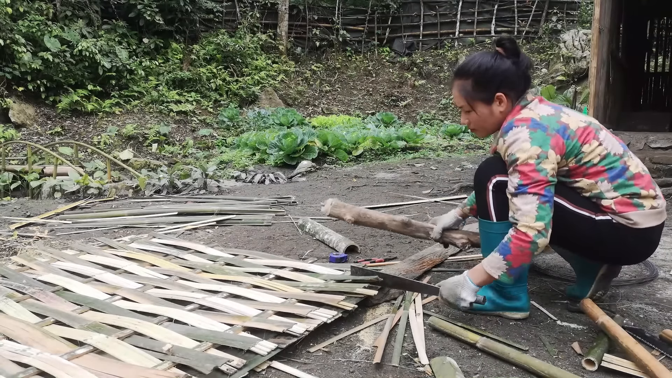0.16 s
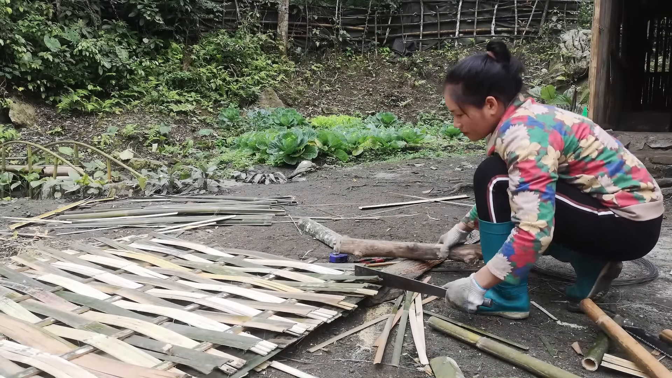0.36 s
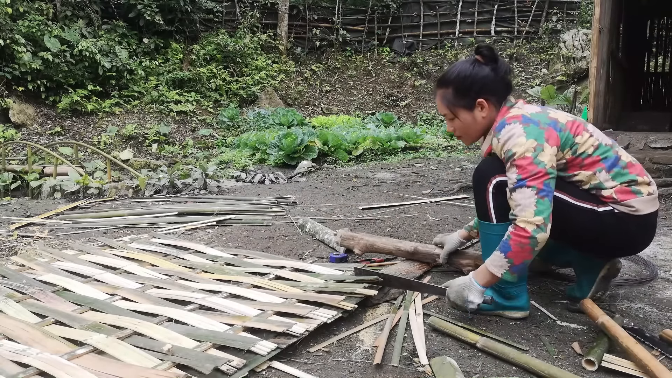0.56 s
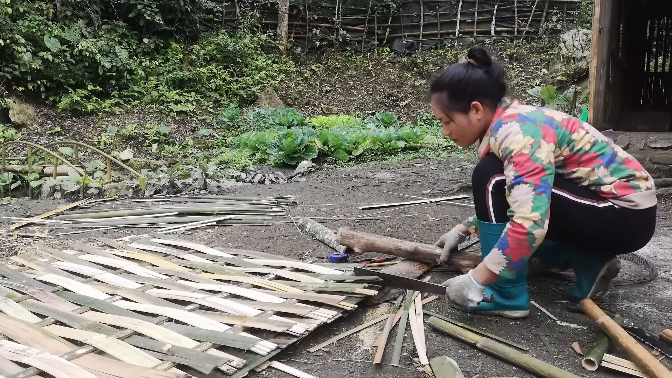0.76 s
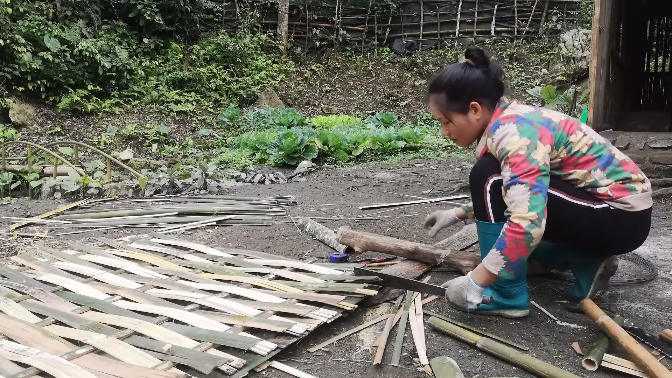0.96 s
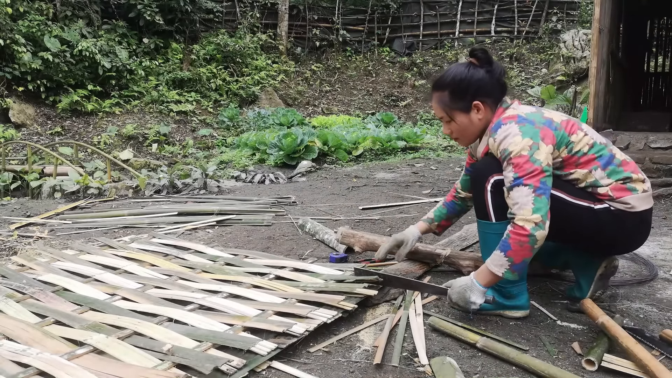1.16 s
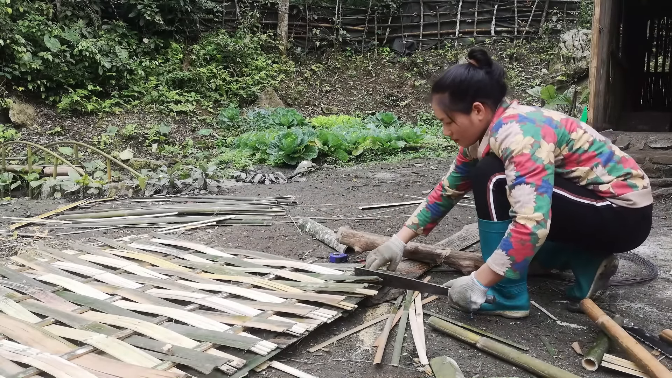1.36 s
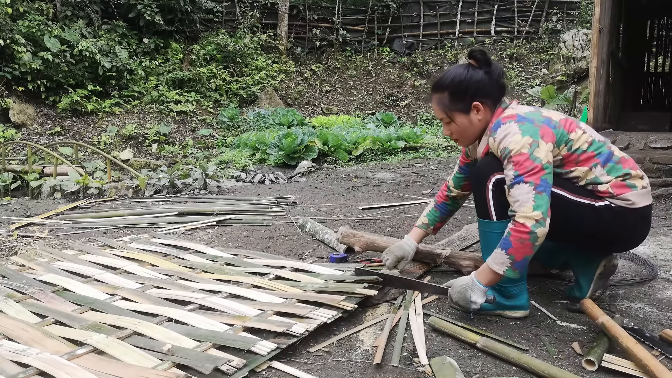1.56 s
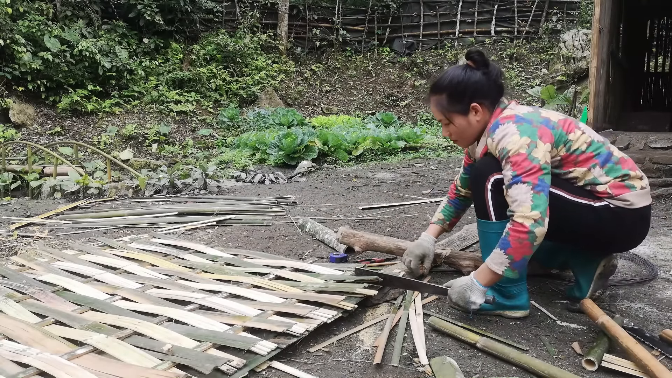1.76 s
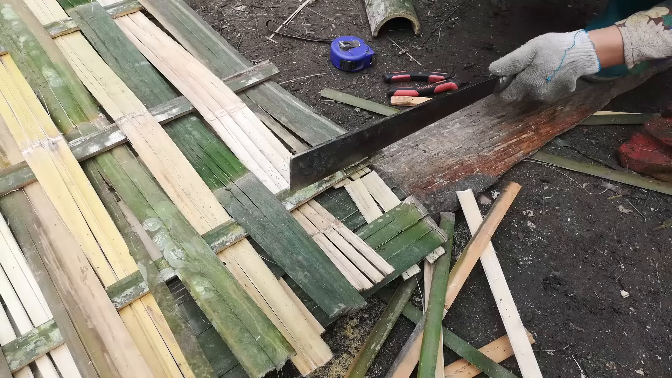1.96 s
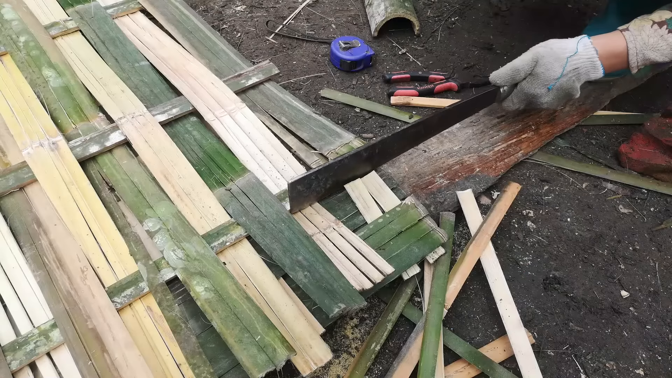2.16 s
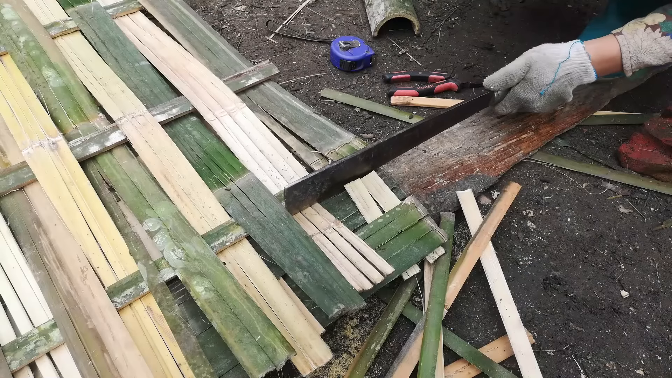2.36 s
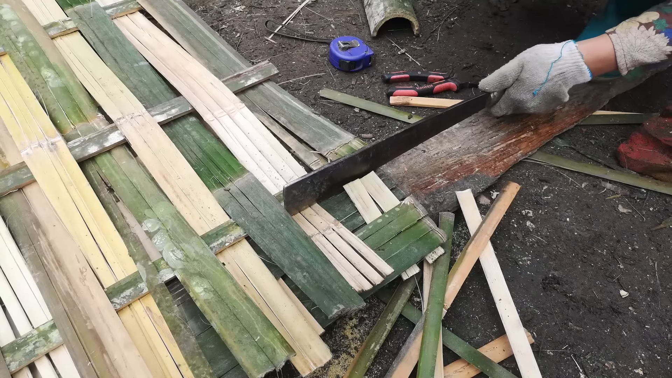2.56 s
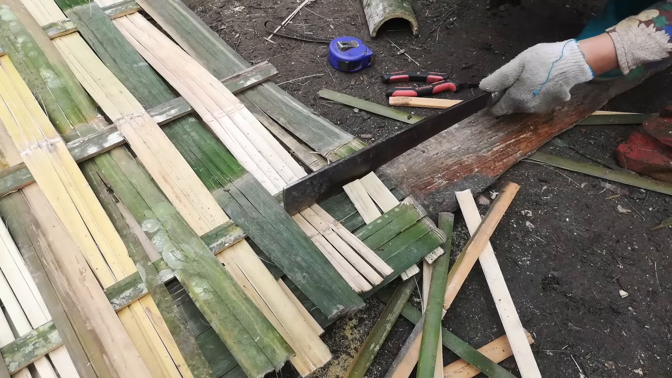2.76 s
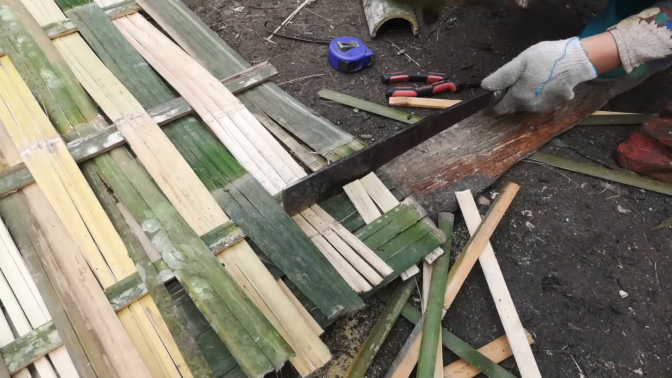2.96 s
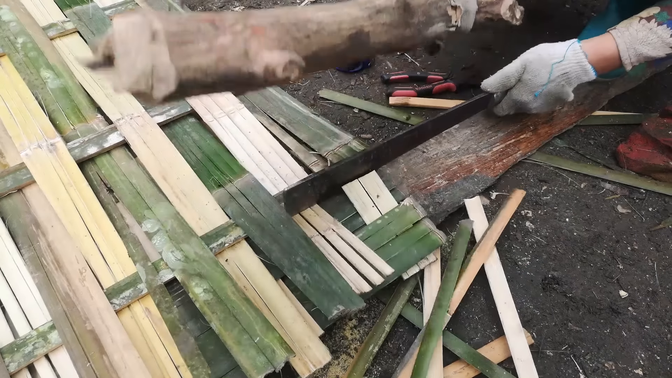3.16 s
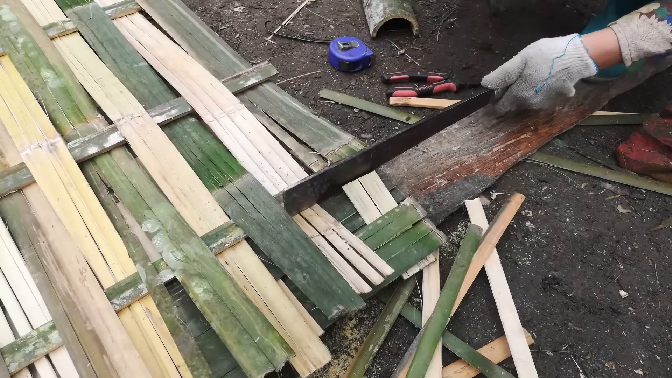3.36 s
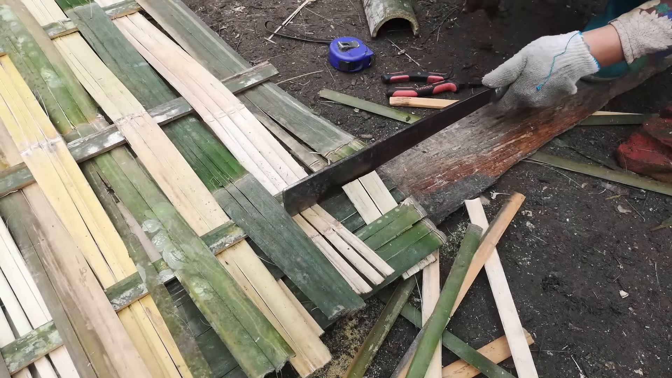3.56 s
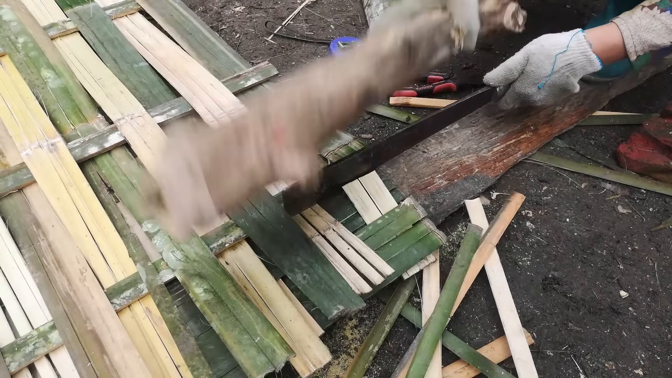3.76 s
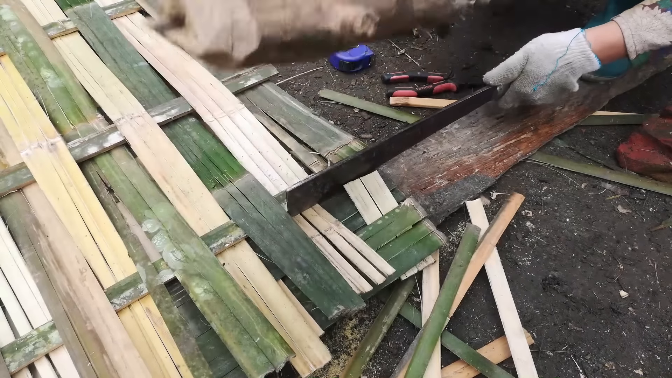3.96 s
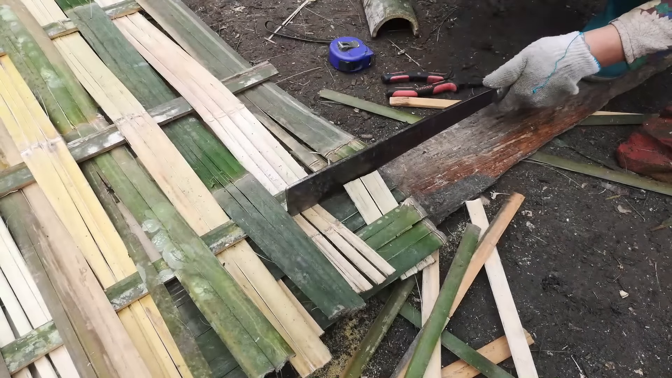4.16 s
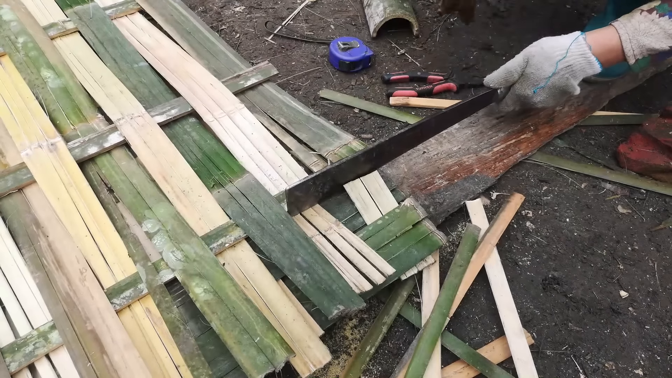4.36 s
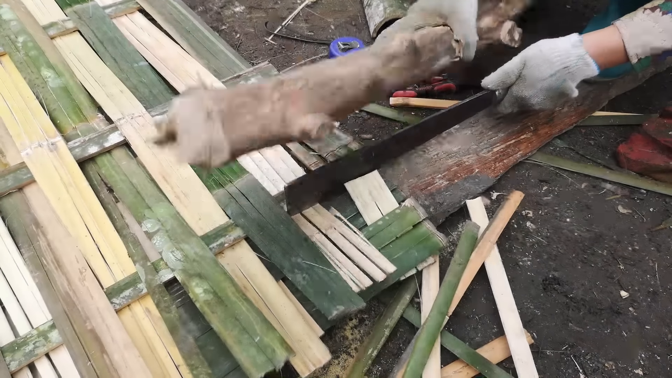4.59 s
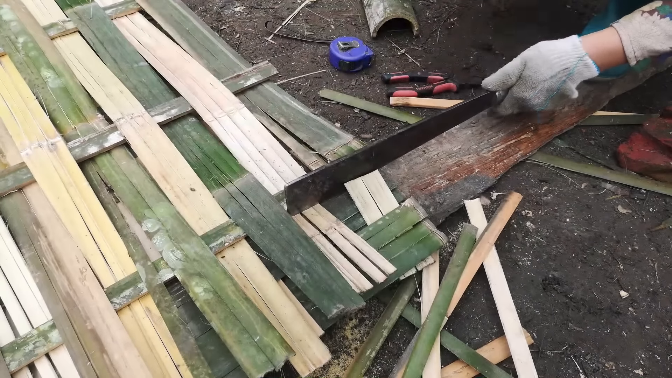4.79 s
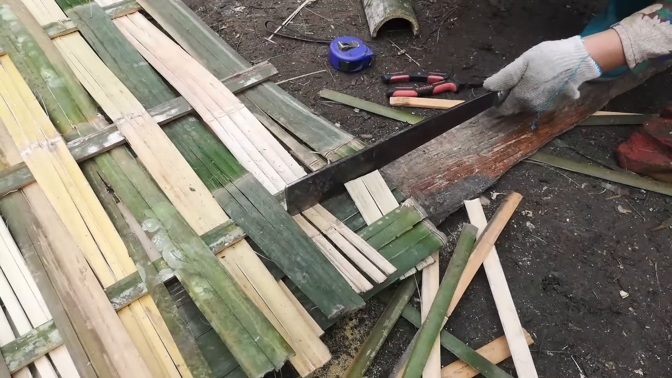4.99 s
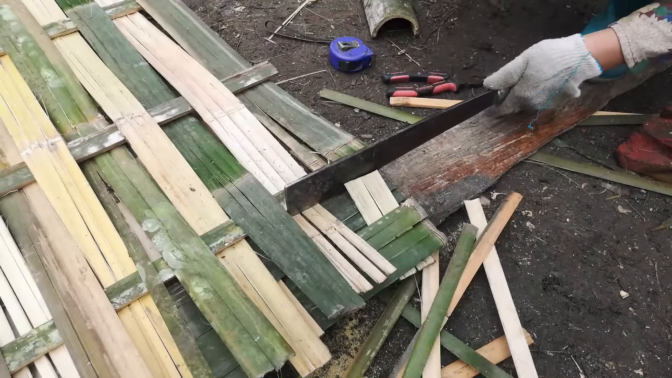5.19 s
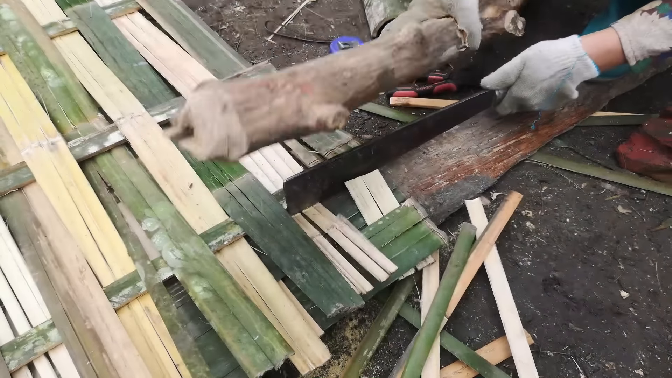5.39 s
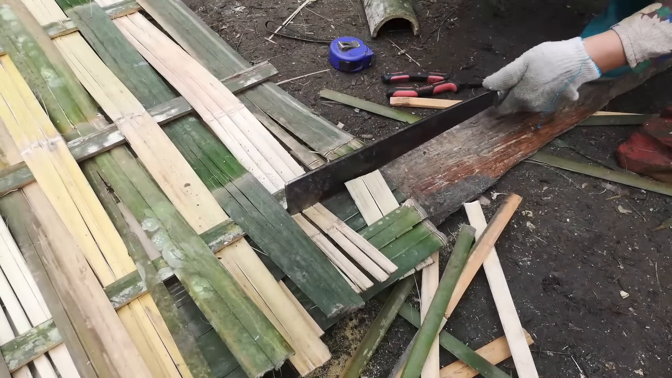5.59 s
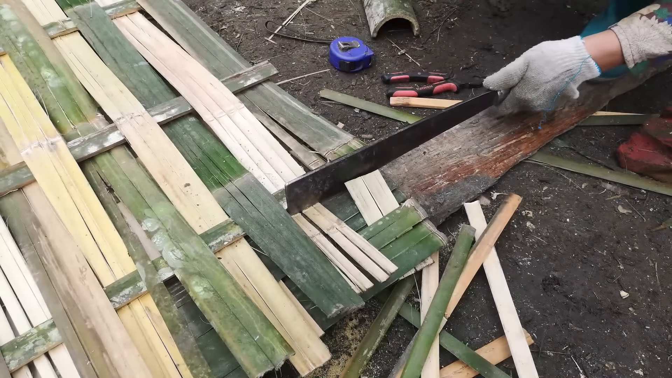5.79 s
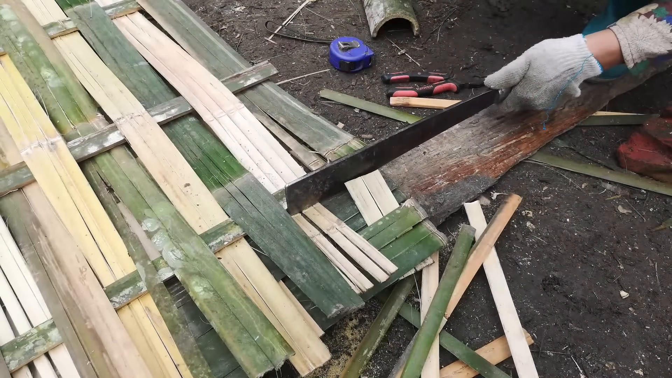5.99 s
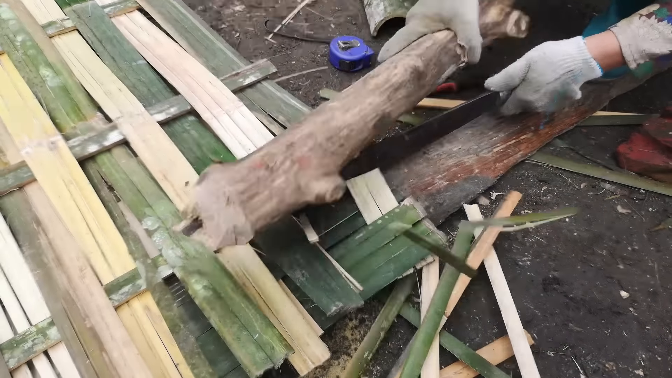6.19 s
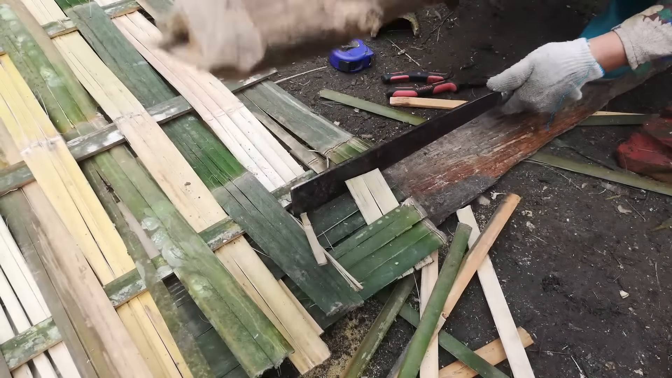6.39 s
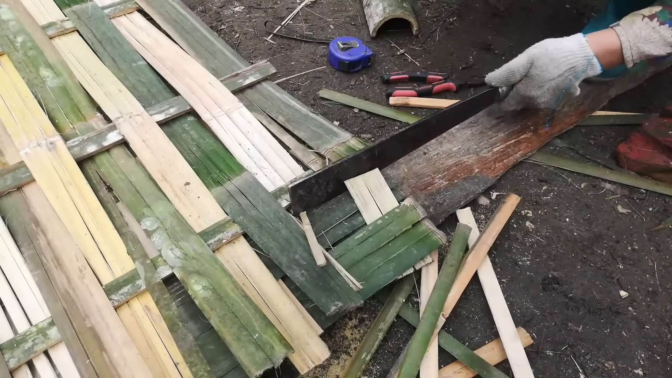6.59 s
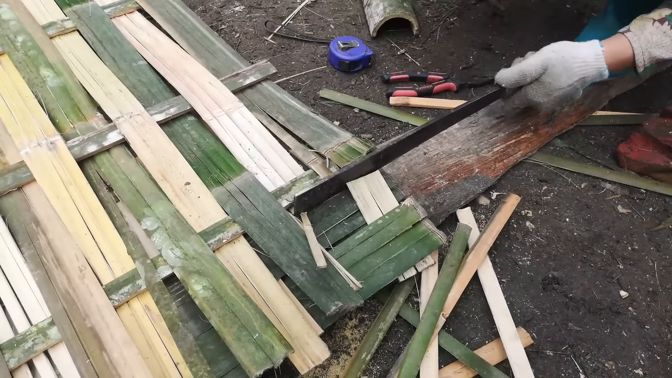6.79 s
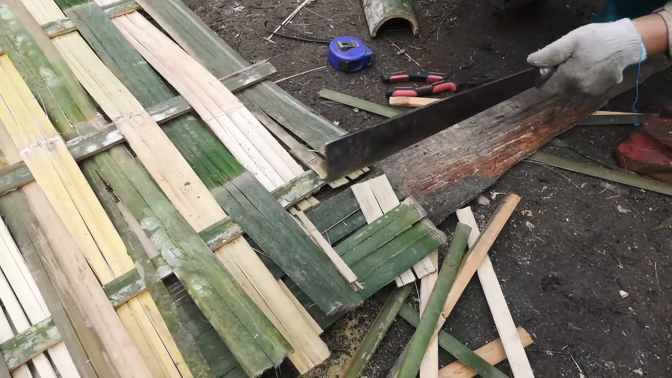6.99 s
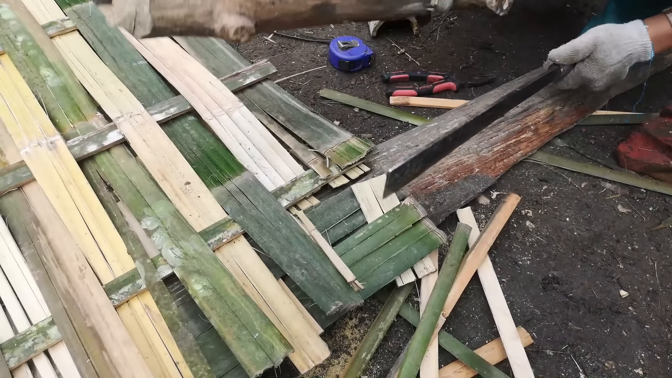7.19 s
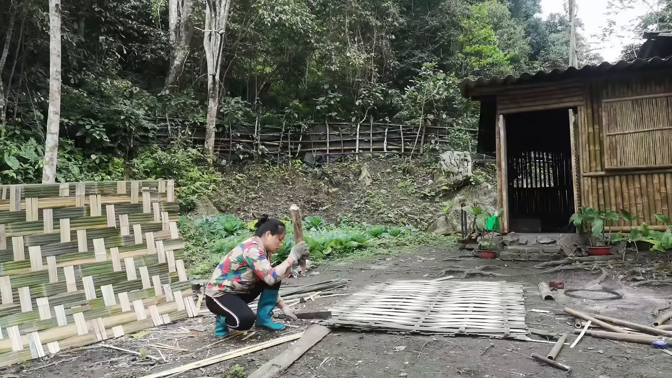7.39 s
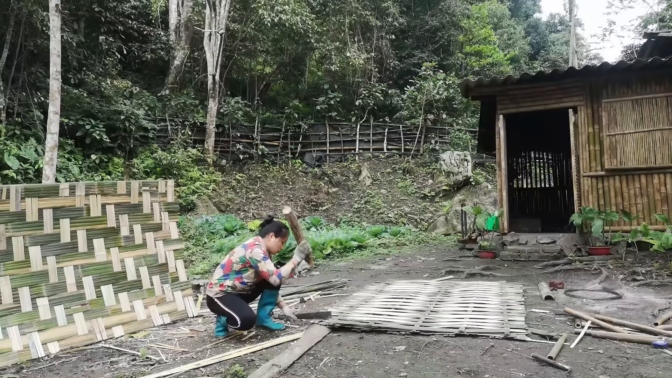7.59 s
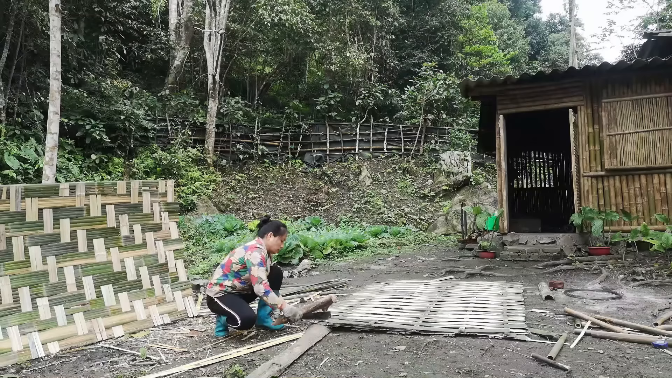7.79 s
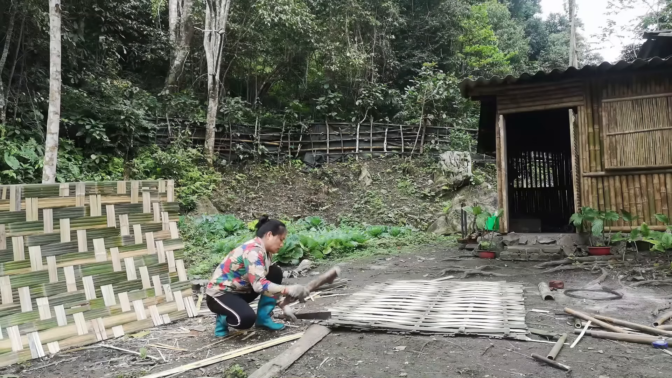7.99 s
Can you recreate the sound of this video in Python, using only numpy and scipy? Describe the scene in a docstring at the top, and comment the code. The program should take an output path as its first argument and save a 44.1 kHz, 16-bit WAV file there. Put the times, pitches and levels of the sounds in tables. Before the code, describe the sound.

A club is dropped on earth, then hammers a blade through bamboo slats in sharp spaced cracks, over leaf hiss, bird whistles and insects.

```python
"""Six hard cracks of a club driving a machete through the edge of a woven bamboo mat, in a yard by a forest.
Leaf hiss, insects, birds and wind lie behind; knocks, rubs and a dropped club precede the blows.
Noise bursts excite decaying modes of wood, steel and earth; an offcut bounces and the blade squeaks out.
Coloured noise makes the forest, the wind and the yard's diffuse echo; gliding sines make the whistles.
A limiter ducks each blow and lets the echo of the yard swell back."""
import sys
import numpy as np
from scipy import signal
from scipy.fft import rfft, irfft, next_fast_len
from scipy.io import wavfile
from scipy.ndimage import uniform_filter1d

SR = 44100
rng = np.random.default_rng(int(sys.argv[2]) if len(sys.argv) > 2 else 0)


def unload_wav(signal):
    """Save mono or channel-first audio to the path in sys.argv[1] as 16-bit WAV at rate SR, clipped to [-1, 1]."""
    wavfile.write(
        sys.argv[1],
        SR,
        np.round(np.clip(np.atleast_2d(signal).T, -1, 1) * 32767).astype(np.int16),
    )


N = 355005
TIME = np.arange(N) / SR
AGE = TIME[:SR // 2]  # time since a contact [s]

# club blows on the blade: (time [s], force [dB], splitting time scale [s], woody bass [dB], and then, relative
# to the body: fibre snaps [dB], blade ring [dB, before the body is levelled], mat rattle [dB], ground boom [dB])
BLOWS = [(3.1402, 16.5, 0.0046, -2, -14, -16, -37.5, -33),
         (3.8974, 17.5, .0042, 0, -14.5, 0.5, -33.5, -35.5),
         (4.6526, 20.5, .0038, -1, -12, 0.5, -29.5, -32.5), (5.4325, 17.5, .004, -1, -14, 2, -31.5, -34),
         (6.275, 26.5, .0036, 1, -14.5, 4, -33.5, -36), (7.8831, 12.5, .0028, 6.5, -7, -3.5, -23, -21.5)]
# club and slats ringing together: (frequency [Hz], t60 [s], level [dB])
CHOP_MODES = [(224, 0.034, -14.5), (515.6, .015, -8.5), (971, 0.015, 0), (1127, 0.014, -4),
              (1367, 0.018, -3.5), (2112, 0.019, -3.5), (2715, 0.013, -1), (3650, 0.0082, -2.5),
              (4890, 0.0072, -12), (5850, 0.0076, -11.5), (6800, 0.024, -14.5), (7730, 0.019, -3)]
# clattering slats: (frequency [Hz], level [dB])
SLATS = [(100, -5.5), (400, -7), (800, -3), (1600, 3), (2400, 1), (3800, -6.5), (6000, 0), (8000, 3),
         (10500, -16.5), (16000, -26)]
# packed earth under an impact: (frequency [Hz], t60 [s], level [dB])
EARTH_MODES = [(81.6, 0.073, -10.5), (176, 0.037, -1), (253.5, 0.081, -7), (387, 0.019, -0.5),
               (455, 0.013, -7)]


def undb(db):
    """Turn decibels into an amplitude gain."""
    return 10 ** (np.asarray(db) / 20)


def unit(x):
    """Scale a sound to an RMS of 1."""
    return x / np.sqrt(np.mean(x ** 2))


def colour(x, points):
    """Causal minimum-phase filter with a (frequency [Hz], level [dB]) response."""
    size = 2 * next_fast_len(x.shape[-1])
    hz, db = np.transpose(points)
    freq = np.maximum(np.fft.rfftfreq(size, 1 / SR), 1)
    response_db = np.interp(np.log(freq), np.log(hz), db)
    cepstrum = irfft(np.log(undb(response_db)))
    # folding the cepstrum onto positive time makes the filter causal
    fold = np.r_[1, np.full(size // 2 - 1, 2), 1, np.zeros(size // 2 - 1)]
    response = np.exp(rfft(cepstrum * fold))
    return irfft(rfft(x, size) * response)[..., :x.shape[-1]]


def whiten(x):
    """Give a burst equal strength at every pitch."""
    spectrum = rfft(x)
    return irfft(spectrum / (np.abs(spectrum) + 1e-12), x.shape[-1])


def ring(modes, detune=0., spread_db=0.):
    """Decaying modes; detune and spread shift their pitch and balance a little at each contact."""
    hz, t60, db = np.transpose(modes)[:, :, None]
    shift, weight = rng.standard_normal((2, len(modes), 1))
    sign = (-1) ** np.arange(len(modes))[:, None]
    decay = np.exp(-np.log(1000) * AGE / t60)
    waves = np.sin(2 * np.pi * hz * (1 + detune * shift) * AGE) * decay
    return np.sum(sign * undb(db + spread_db * weight) * waves, axis=0)


def through(x, response):
    """Pass a sound through a resonant body by convolution."""
    return signal.fftconvolve(np.atleast_2d(x), np.atleast_2d(response), axes=1)[:, :x.shape[-1]]


def walk(rate):
    """Smooth random drift with an RMS near 1, taking this many new values a second."""
    size = int(SR / rate)
    steps = np.repeat(rng.standard_normal(N // size + 1), size)
    return unit(uniform_filter1d(steps, size))[:N]


def grains(size, spread_db, shared=0.4):
    """Dense noise of uneven strength, like tiny clicks, partly alike on both sides."""
    noise = rng.standard_normal((3, size))
    surge = np.repeat(rng.exponential(size=size // 20 + 1), 20)[:size]
    strength = undb(spread_db * np.minimum(surge, 5))
    shared = np.clip(shared, 0, 1)
    return unit(strength * (np.sqrt(shared) * noise[2] + np.sqrt(1 - shared) * noise[:2]))


def swell(s, rise_s, fall_s):
    """Gain that grows exponentially to 1 at a moment and dies away after it."""
    return np.exp(-np.maximum((s - TIME) / rise_s, (TIME - s) / fall_s))


def add(out, s, sound):
    """Mix a sound in at a time."""
    start = max(int(s * SR), 0)
    out[:, start:start + sound.shape[-1]] += sound[..., :max(N - start, 0)]


def forest():
    """Leaf hiss under a high insect chorus, both louder on the left and stepping in level at two moments."""
    # leaves: (frequency [Hz], level [dB])
    leaf_colour = [(100, 5.5), (200, 5), (400, -4), (700, -8), (1200, -5), (2000, 0), (2800, -0.5),
                   (4200, -7.5), (6200, -8.5), (9000, -16.5), (12000, -19.5), (16000, -19)]
    # insect chorus: (frequency [Hz], level [dB])
    insect_colour = [(5500, -34), (6700, -20), (7200, -3.5), (7650, -3), (7950, -6.5), (8300, -21.5),
                     (9500, -44)]
    # steady stretches of background: (start time [s], leaf level [dB], insect level [dB])
    stretches = [(0, -49.5, -57.5), (1.828, -58.5, -59), (7.385, -54, -55.5)]
    starts, leaves_db, insects_db = np.transpose(stretches)
    stretch = np.searchsorted(starts[1:], TIME)
    leaves = unit(colour(rng.standard_normal((2, N)), leaf_colour))
    leaves = leaves * undb(leaves_db[stretch] + .5 * walk(3.1))
    shimmer_db = 1.2 * walk(70)
    insects = unit(colour(rng.standard_normal((2, N)), insect_colour))
    insects = insects * undb(insects_db[stretch] + shimmer_db)
    return leaves * undb([[0], [-3.5]]) + insects * undb([[0], [-9]])  # gains: left, right


def wind():
    """Slow eddies push on both microphone ports nearly alike; gusts add their power to the breeze."""
    # gusts: (peak time [s], level [dB], swelling and fading time constant [s])
    gusts = [(.08, -32, 0.094), (.56, -29, 0.084), (1.08, -28.5, 0.11), (1.53, -32, 0.17),
             (2.0, -29, 0.063), (2.355, -25, 0.032), (3.42, -42.5, 0.17), (3.88, -30.5, 0.044),
             (4.5, -41, .11), (4.889, -18, 0.026), (5.068, -22.5, 0.045), (5.28, -30, 0.11),
             (5.88, -42.5, 0.11), (6.3, -32, 0.069), (6.641, -27, 0.066), (7.95, -34, 0.26)]
    # rumble of the eddies: (frequency [Hz], level [dB])
    rumble = [(4, -5), (10, 12.5), (22, 4.5), (40, -3), (80, -10), (130, -22), (250, -40), (800, -64)]
    breeze_db, breeze_wander_db = -49, 2.5
    eddies = unit(colour(grains(N, spread_db=0.0, shared=0.99), rumble))
    breeze = undb(breeze_db + breeze_wander_db * walk(9.9))
    gust_power = sum((undb(db) * swell(s, time_s, time_s)) ** 2 for s, db, time_s in gusts)
    return eddies * np.sqrt(breeze ** 2 + gust_power)


def rubbing():
    """Slats rub under club and blade: uneven noise, since the surfaces catch and slip many times a second."""
    # strokes: (peak time [s], level [dB], rise time constant [s], fall time constant [s], treble gain [dB])
    strokes = [(.018, -35.5, 0.044, 0.047, -7.5), (.505, -30, .008, .05, -5.5),
               (0.649, -37, .022, 0.056, 0.5), (1.474, -25.5, 0.013, 0.012, 16.5),
               (1.505, -38, 0.021, 0.048, -4), (1.603, -36, 0.021, 0.067, -3),
               (7.02, -34.5, 0.057, 0.052, -1), (7.109, -36, 0.015, 0.008, 3.5)]
    # rasp of the slats: (frequency [Hz], level [dB])
    rasp_colour = [(100, -8.5), (400, -8.5), (800, -5), (1600, 2), (2400, -1.5), (3800, -8.5), (6000, -3.5),
                   (8000, 2), (10500, -14.5), (16000, -19)]
    out = np.zeros((2, N))
    rasp = colour(grains(N, spread_db=2.5, shared=0.29), rasp_colour) * undb(1.5 * walk(160))
    treble = signal.sosfilt(signal.butter(1, 5000, "highpass", fs=SR, output="sos"), rasp)
    for s, db, rise_s, fall_s, treble_db in strokes:
        stroke = unit(rasp + (undb(treble_db) - 1) * treble)
        out += undb(db) * swell(s, rise_s, fall_s) * stroke
    return out


def birds():
    """Gliding sine whistles nearby, and a farther bird's short noise chips smeared by the trees."""
    # whistles: (start time [s], length [s], level [dB], pitches that the note glides through evenly [Hz])
    whistles = [(.372, 0.078, -42, (2410, 2690, 2560, 2400)),
                (.662, 0.16, -37.5, (2330, 2810, 2840, 2666, 2720, 3200)),
                (3.56, .11, -57, (3750, 3380, 3920, 2850, 2550)), (7.41, 0.077, -51, (3300, 2850, 1800))]
    # chips: (time [s], level [dB])
    chips = [(0.234, -57), (.37, -55.5), (.61, -58), (.82, -50), (.985, -50), (1.215, -49), (1.416, -52)]
    edge_s, flutter_db = 0.032, 3  # fade in and out; unsteadiness of the level
    chip_colour = [(2500, -37), (3400, -8), (3850, -5), (4150, -12), (5000, -33)]  # (frequency [Hz], level [dB])
    out = np.zeros((2, N))
    for s, length_s, db, pitches in whistles:
        glide = np.interp(AGE, np.linspace(0, length_s, len(pitches)), pitches)
        hz = uniform_filter1d(glide, size=700)
        fade = np.clip(np.minimum(AGE, length_s - AGE) / edge_s, 0, 1)
        tone = np.sin(2 * np.pi * np.cumsum(hz) / SR)
        add(out, s, fade * tone * undb(db + flutter_db * walk(100)[:len(AGE)]))
    smear = AGE / 0.022 * np.exp(1 - AGE / 0.021)
    for s, db in chips:
        scattered = unit(colour(rng.standard_normal((2, len(AGE))), chip_colour))
        add(out, s - .01, undb(db) * scattered * smear)  # the smear starts a little early
    return out


def knock(length_s, bass_db, treble_db):
    """A dry clatter of contacts, plus the short ring of the slats."""
    contacts = np.exp(-AGE / length_s) * grains(len(AGE), spread_db=0.4, shared=0.52)
    clatter = unit(colour(contacts, SLATS))
    slat_ring = unit(through(contacts, ring(CHOP_MODES, detune=0.0772, spread_db=10.0)))
    wood = clatter + undb(-11) * slat_ring
    tone = [(600, bass_db), (1400, 0.001), (6000, treble_db)]
    return unit(colour(wood, tone)) * np.std(contacts)


def knocks():
    """Light knocks of club, blade and slats, each a decaying clatter with its own tone."""
    # knocks: (time [s], contact level [dB], decay time constant [s], bass [dB], treble [dB])
    light_knocks = [(.417, -43, .003, -6, 14), (0.464, -24.5, .012, -1, -6), (0.474, -22.5, 0.026, 0.5, -4),
                    (.487, -19.5, 0.014, -3, -3.5), (1.420, -36, 0.0044, -3, 8),
                    (1.579, -24.5, 0.0015, -6, 12), (1.628, -25.5, 0.008, -5, -3.5),
                    (1.66, -28.5, 0.024, -4, -7), (2.262, -31, .015, 4, -8.5),
                    (2.297, -32.5, 0.012, -6, -16), (2.32, -37, 0.0065, 0, -5), (2.447, -39, .013, 0, -2.5),
                    (3.193, -16.5, 0.0047, -5, -6), (3.341, -36, 0.034, -2, 0), (4.62, -42, 0.0022, -1, 15),
                    (5.454, -5, 0.0053, 1, 8), (7.026, -25.5, 0.0091, 2.5, -2),
                    (7.049, -26, 0.0097, 2, 3.5), (7.378, -37, 0.0093, 2, -11.5)]
    out = np.zeros((2, N))
    for s, db, length_s, bass_db, treble_db in light_knocks:
        add(out, s, undb(db) * knock(length_s, bass_db, treble_db))
    return out


def dropped_club(count):
    """The club lands on packed earth and bounces quickly, each bounce weaker, ringing the ground's modes."""
    drop_s, drop_db = .4644, -7.5
    bounce_gap_s, bounce_loss_db = .015, 8.5
    out = np.zeros((2, N))
    for bounce in range(count):
        level_db = drop_db - bounce_loss_db * bounce
        add(out, drop_s + bounce_gap_s * bounce, undb(level_db) * ring(EARTH_MODES))
    return out


def thuds():
    """Soft low thumps, all sharing one low ring."""
    # thumps: (time [s], level [dB])
    thumps = [(.542, -27), (.585, -32.5), (1.987, -34), (2.004, -38), (2.263, -44), (2.346, -43),
              (3.345, -43.5)]
    out = np.zeros((2, N))
    for s, db in thumps:
        add(out, s, undb(db) * ring(EARTH_MODES))
    return out


def chops():
    """The club drives the blade in; fibres snap for a few ms, the loose weave chatters and the club rebounds."""
    # snapping fibres: (frequency [Hz], level [dB])
    fibre_colour = [(150, -27.5), (600, -0.5), (1500, -11), (2500, 1), (3800, -1), (5500, 2.5), (8000, 3),
                    (9500, -9.5), (12000, -18), (16000, -23.5)]
    # the wedged blade: (frequency [Hz], t60 [s], level [dB])
    blade_modes = [(1773, 0.017, 3)]
    # the mat booming on the ground: (frequency [Hz], t60 [s], level [dB])
    ground_modes = [(59.6, 0.33, -8.5), (97.7, .16, -1), (126, 0.081, -4.5), (230.8, 0.26, -16)]
    split_rise = .7  # the splitting grows with this power of time
    out = np.zeros((2, N))
    for s, db, split_s, bass_db, snap_db, blade_db, rattle_db, boom_db in BLOWS:
        splitting = (AGE / split_s) ** split_rise * np.exp(1 / 2 - (AGE / split_s * 0.86) ** 3)
        # the many small breaks add up to one broadband push
        push = splitting * grains(len(AGE), spread_db=0.0, shared=0.832)
        for _ in range(2):
            push = splitting * whiten(push)

        wood_and_blade = ring(CHOP_MODES, detune=0.0092, spread_db=4.0) - undb(blade_db) * ring(blade_modes)
        body = colour(through(push, wood_and_blade), [(900, bass_db), (2000, 0)])
        body = body / np.abs(body).max()

        snap_noise = unit(colour(grains(len(AGE), spread_db=0.5, shared=0.58), fibre_colour))
        snaps = (splitting + 0.28 * np.exp(-AGE / 0.015)) * snap_noise

        chatter = undb(2.33 * walk(170)[:len(AGE)]) * np.exp(-AGE / 0.046)
        rebound = .5 * np.exp(-np.abs(AGE - .056) / 0.002)
        rattle = (chatter + rebound) * unit(colour(grains(len(AGE), spread_db=0.5, shared=0.26), SLATS))

        boom = undb(boom_db) * ring(ground_modes, detune=0.012)
        add(out, s, undb(db) * (body + undb(snap_db) * snaps + undb(rattle_db) * rattle + boom))
    return out


def settling(count):
    """After each blow a few lifted slats slap back at chance moments, more faintly the later they fall."""
    settle_db, fade_db_per_s = -35, 95  # level relative to the blow's force, and its loss with delay
    span_s = .2
    out = np.zeros((2, N))
    for s, db, *_ in BLOWS:
        for late_s in span_s * rng.uniform(.1, 1, count):
            slap = knock(length_s=.004, bass_db=-6.5, treble_db=0)
            add(out, s + late_s, undb(db + settle_db - fade_db_per_s * late_s) * slap)
    return out


def offcut():
    """A loose piece of bamboo bounces; each contact wakes some of its modes more than the rest."""
    # bounces: (time [s], ring gain [dB], pitch that the contact favours [Hz], click level [dB])
    bounces = [(6.5033, 5.5, 2960, -13), (6.536, -0.5, 1620, -11), (6.550, -16, 4000, -33),
               (6.733, -4.5, 4740, -3.5), (6.762, -20, 3430, -20), (6.788, -22, 1300, -57),
               (6.807, -25.5, 1300, -47), (6.852, -26, 2380, -34)]
    # bending modes: (frequency [Hz], t60 [s], level before the contact's favouring [dB])
    bending_modes = [(1060, 0.17, -34), (1407, 0.085, -13), (1760, 0.035, -19), (2270, 0.1, -15.5),
                     (2372, 0.03, -3), (2870, 0.038, -18), (3170, .035, -20), (3725, 0.032, -10.5),
                     (4640, 0.025, -14.5), (5640, .026, -5), (7200, 0.03, -12), (10600, 0.027, -27)]
    # hard edge clicking: (frequency [Hz], level [dB])
    click_colour = [(300, -13), (1500, -10.5), (3000, -1.5), (4200, 6), (5800, -3), (8000, -4),
                    (11000, -17.5), (16000, -33)]
    loss_db_per_octave = 11  # away from the favoured pitch
    out = np.zeros((2, N))
    for s, db, favoured_hz, click_db in bounces:
        modes = [(hz, t60, mode_db - loss_db_per_octave * abs(np.log2(hz / favoured_hz)))
                 for hz, t60, mode_db in bending_modes]
        click = np.exp(-AGE / 0.002) * unit(colour(grains(len(AGE), spread_db=5.0), click_colour))
        tone = ring(modes, detune=0.011, spread_db=1.2)
        add(out, s, undb(db) * tone + undb(click_db) * click)
    return out


def blade_slide():
    """The steel catches and slips on its way out of the cut; every slip rings a little differently."""
    # pulls on the blade: (time [s], length [s], mid-pull level [dB])
    pulls = [(6.596, .075, -23), (6.69, 0.032, -24)]
    # steel resonances: (frequency [Hz], t60 [s], level [dB])
    steel_modes = [(2350, 0.0023, -6.5), (5630, 0.0059, -1.5), (7740, 0.0098, 9), (10130, 0.011, -2),
                   (11700, .004, -13), (13300, .006, -9)]
    slips_per_s, sag_db = 105, 3.5  # a pull is this much weaker at its ends
    out = np.zeros((2, N))
    for s, length_s, db in pulls:
        for late_s in np.arange(0, length_s, 1 / slips_per_s):
            slip = np.exp(-AGE / 0.0082) * grains(len(AGE), spread_db=1.5)
            tinkle = through(slip, ring(steel_modes, detune=0.041, spread_db=6.0))
            slip_db = db - sag_db * (2 * late_s / length_s - 1) ** 2 + 2.4 * rng.standard_normal()
            jitter_s = rng.uniform(-0.0034, 0.0033)
            add(out, s + late_s + jitter_s, undb(slip_db) * tinkle / np.abs(tinkle).max())
    return out


def yard(x):
    """Trees, slope and hut scatter each octave's energy into a diffuse echo that builds up, then dies away."""
    # echo by octave: (centre frequency [Hz], t60 [s], level before the echo colour [dB])
    octaves = [(122, 0.66, -10.5), (243.5, 0.59, -21), (532, 0.65, -25), (1045, 1, -29), (2063, 0.67, -23),
               (3850, 0.65, -21.5), (7730, 0.55, -27)]
    # colour of the whole echo: (frequency [Hz], level [dB])
    echo_colour = [(700, -2), (1200, -4.5), (1900, 1.5), (3000, -4), (4500, -4.5), (7800, 9.5),
                   (10000, -10.5), (13000, -7.5), (16000, 9.5)]
    out = np.zeros((2, N))
    for hz, t60, db in octaves:
        octave = signal.butter(3, hz * np.array([1, 2]) / np.sqrt(2), "bandpass", fs=SR, output="sos")
        energy = signal.sosfilt(octave, x[0]) ** 2
        for seconds in (.02, t60 / np.log(1e6)):  # build-up, then decay
            keep = np.exp(-1 / (seconds * SR))
            energy = signal.lfilter([1 - keep], [1, -keep], energy + 1e-18)
        diffuse = unit(signal.sosfilt(octave, rng.standard_normal((2, N))))
        out += undb(db) * np.sqrt(energy) * diffuse
    return colour(out, echo_colour)


def scene():
    """Work and birds are to the left: they reach the right port later and shaded, mostly weaker."""
    # shading of the right side: (frequency [Hz], level [dB])
    shade = [(100, 1), (250, -1.5), (550, -10), (1100, -4), (1900, -6.5), (3000, -7.5), (5000, -7.5),
             (7700, -16), (10000, 2), (15000, -3.5)]
    background = forest() + wind()
    contacts = rubbing() + knocks() + dropped_club(count=4) + thuds()
    cutting = chops() + settling(count=4) + offcut() + blade_slide()
    near = contacts + cutting + birds()
    left, right = near + yard(near)
    right = colour(np.r_[np.zeros(2), right[:-2]], shade)  # two samples late
    return np.array([left, right]) + background


def limiter(x, ceiling_db, release_db_per_s):
    """Watches the power a few ms ahead, ducks at once and recovers at a steady rate."""
    power = np.abs(uniform_filter1d(x ** 2, size=200, axis=1)).max(axis=0)
    over_db = np.maximum(10 * np.log10(power + 1e-12) - ceiling_db, 0)
    # a running maximum on a rising ramp lets the ducking fall no faster than the release
    recovery = release_db_per_s * TIME
    duck_db = np.maximum.accumulate(over_db + recovery) - recovery
    return x * undb(-uniform_filter1d(duck_db, size=40))


def record(dry):
    """Limits the blows, rounds the remaining peaks by soft saturation and cuts the treble above 16 kHz."""
    limited = np.tanh(limiter(dry, ceiling_db=-5, release_db_per_s=82))
    return signal.sosfilt(signal.ellip(8, .2, 70, 16000, fs=SR, output="sos"), limited)


dry = scene()
out = record(dry)
unload_wav(out)
```